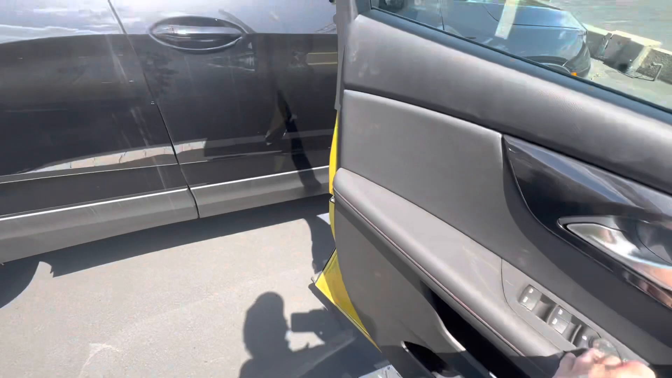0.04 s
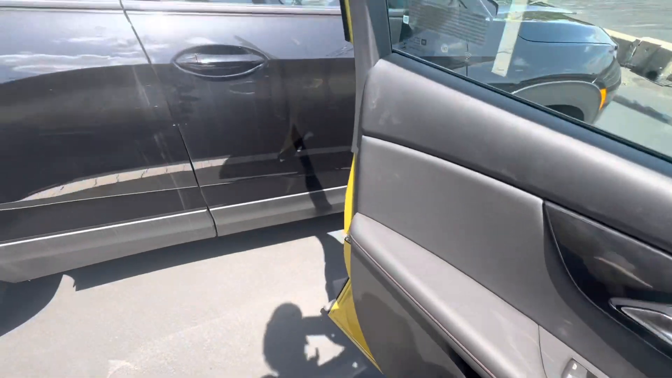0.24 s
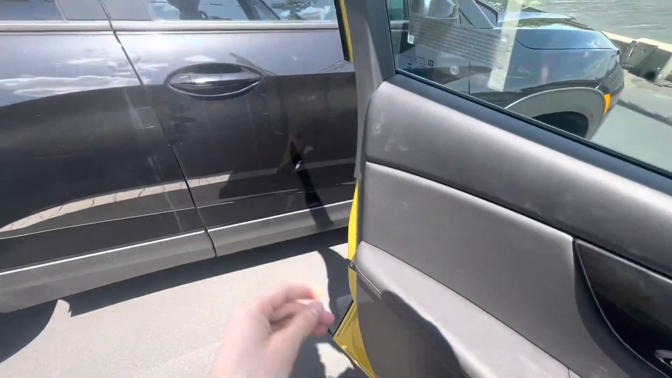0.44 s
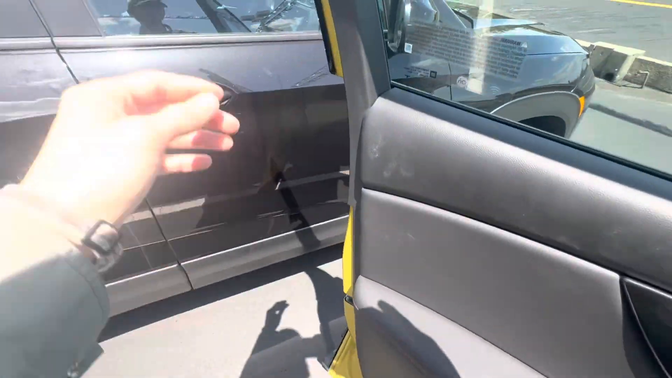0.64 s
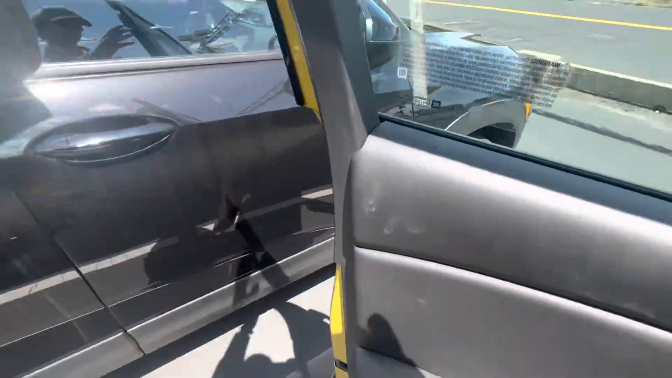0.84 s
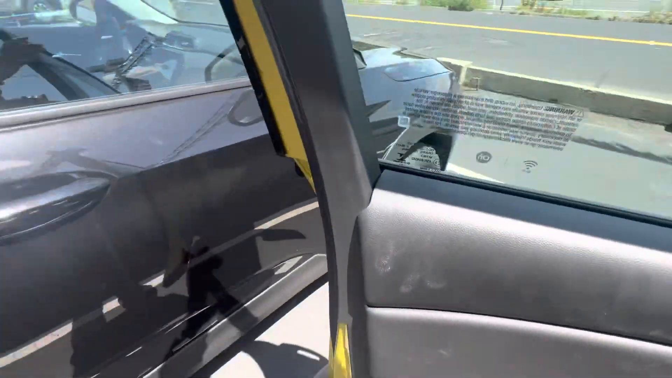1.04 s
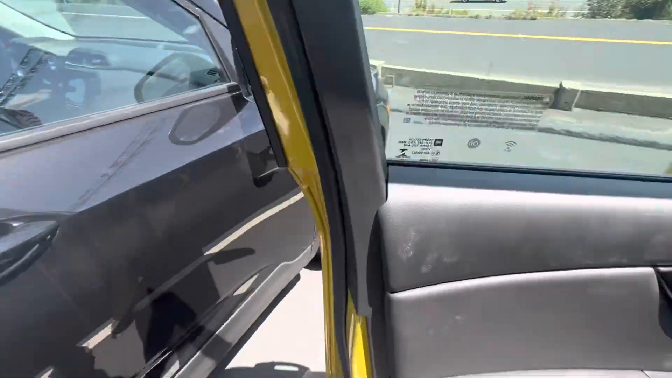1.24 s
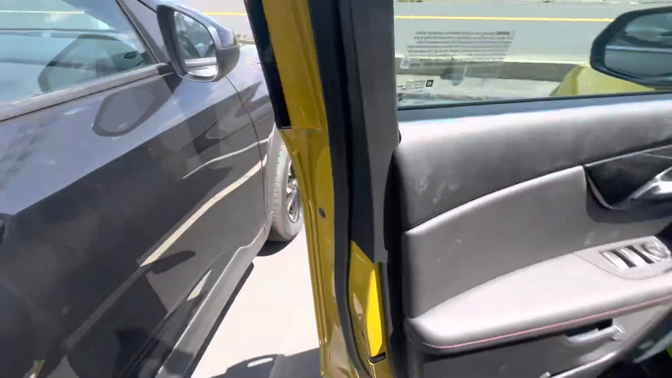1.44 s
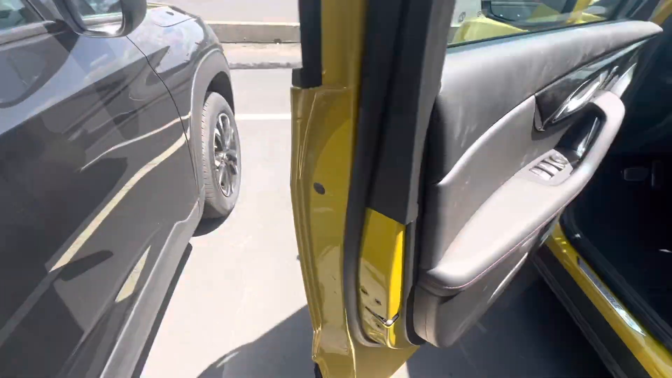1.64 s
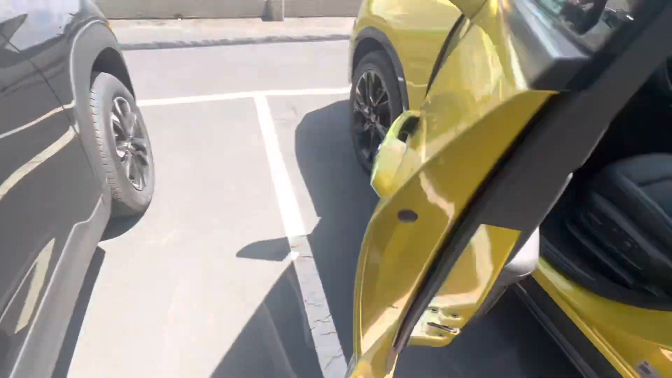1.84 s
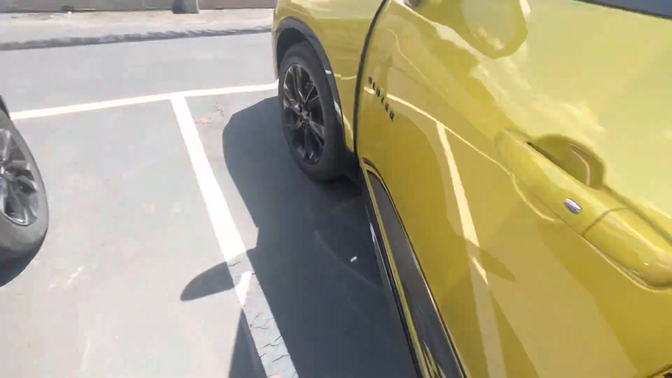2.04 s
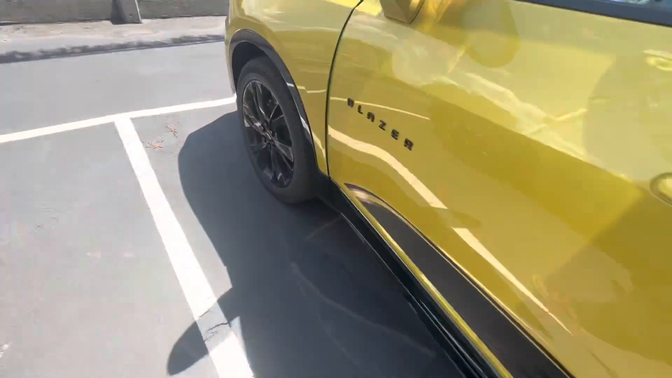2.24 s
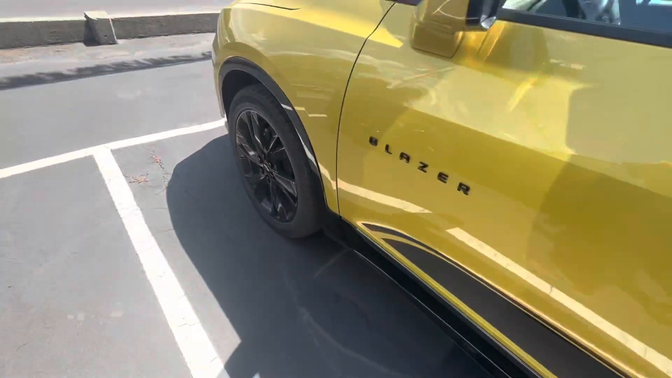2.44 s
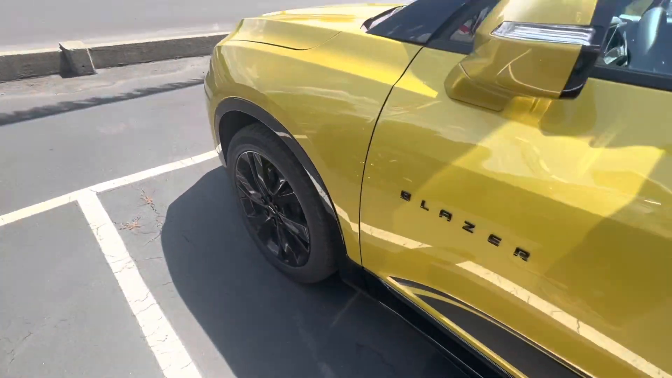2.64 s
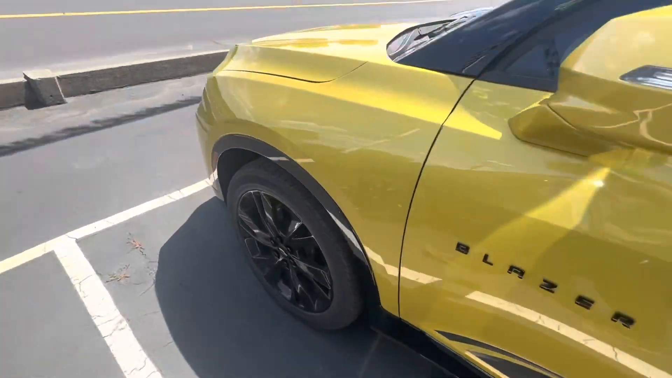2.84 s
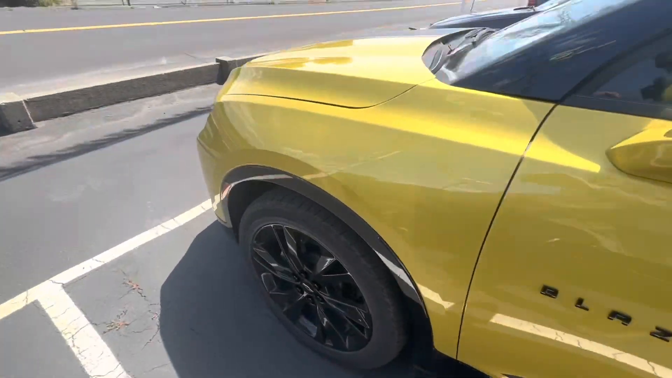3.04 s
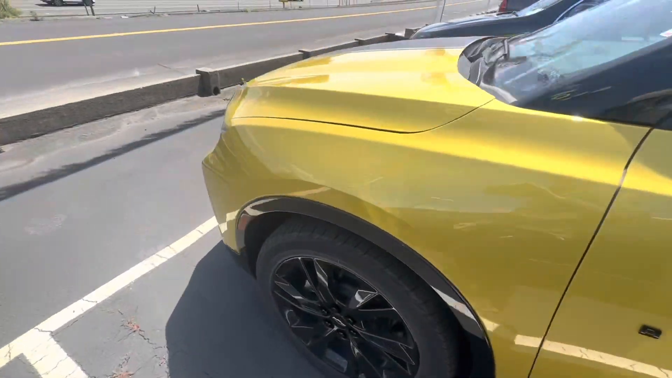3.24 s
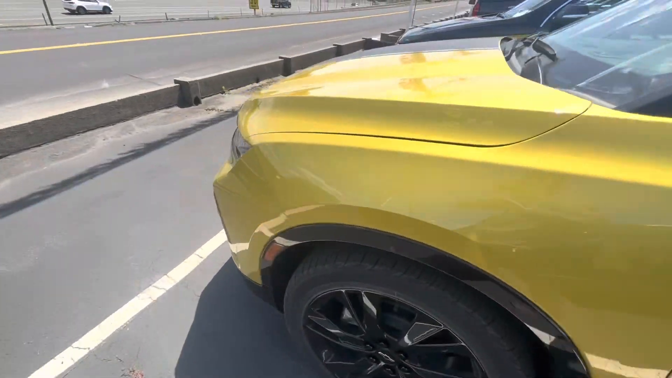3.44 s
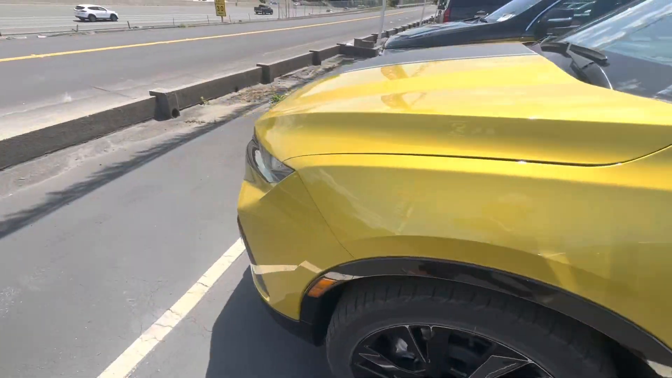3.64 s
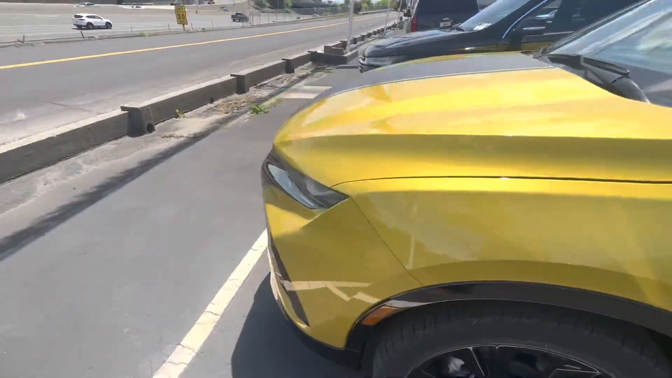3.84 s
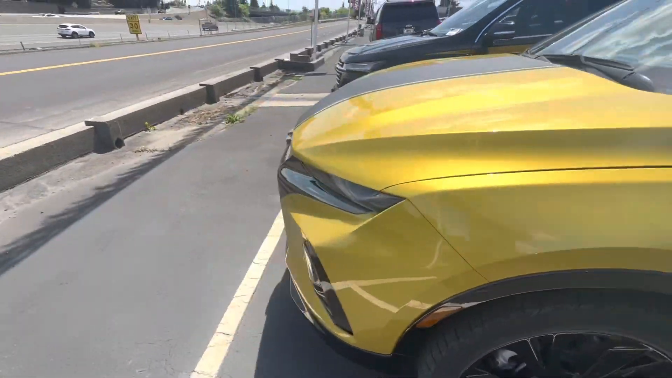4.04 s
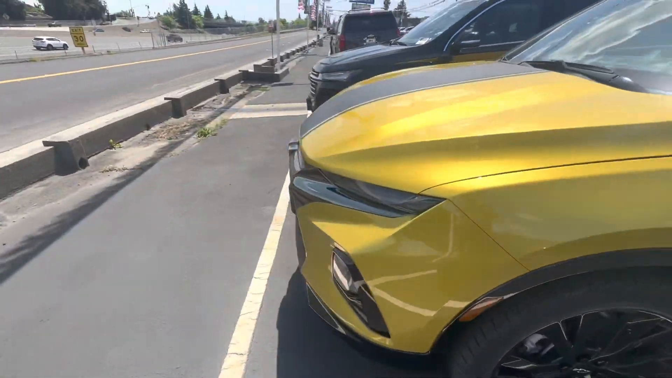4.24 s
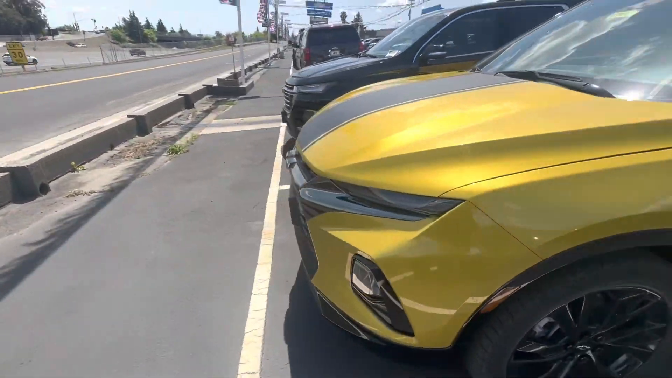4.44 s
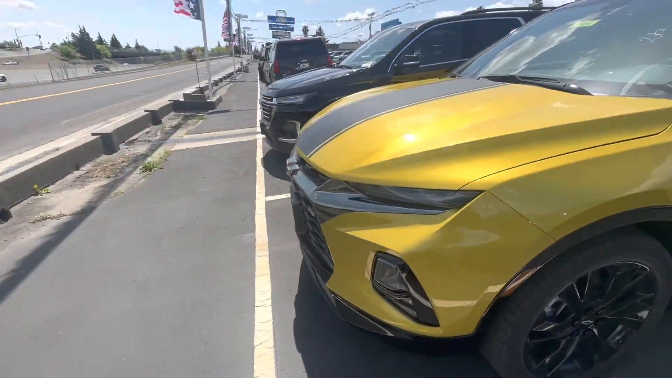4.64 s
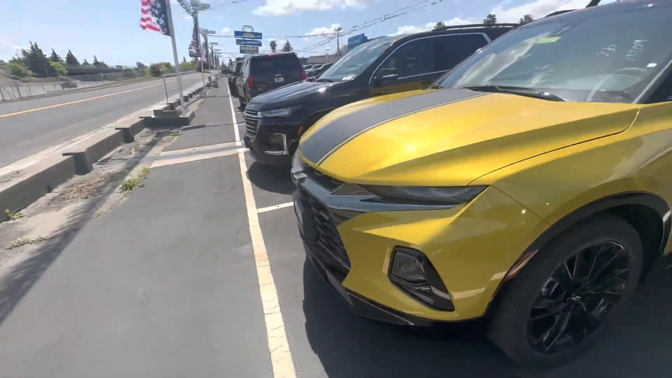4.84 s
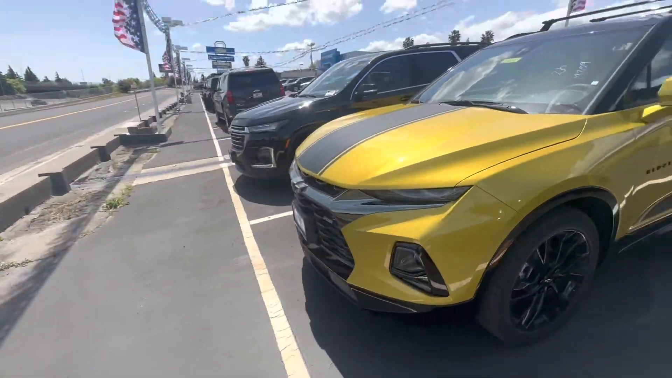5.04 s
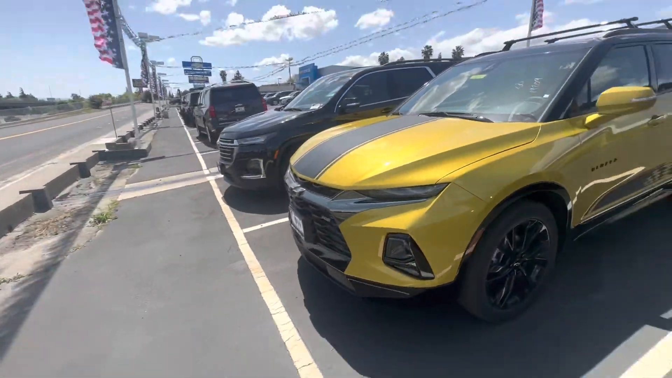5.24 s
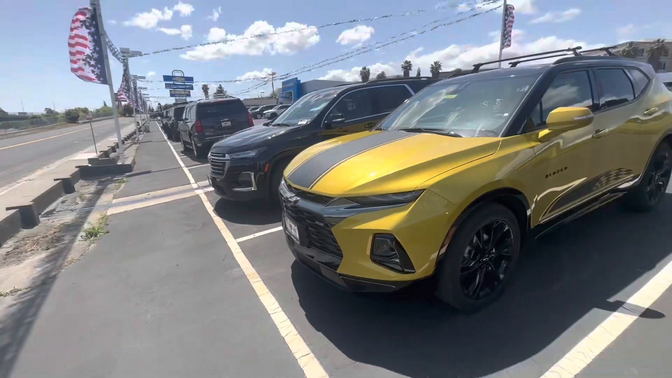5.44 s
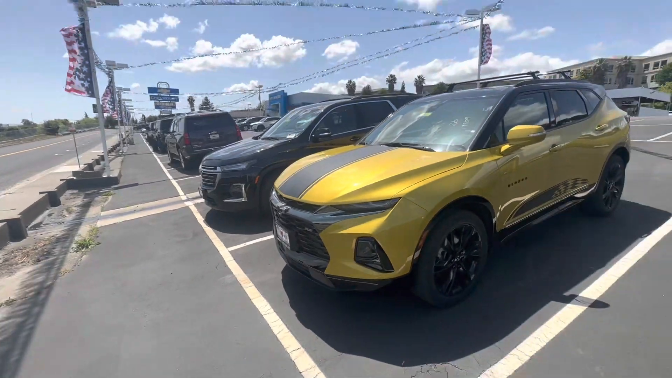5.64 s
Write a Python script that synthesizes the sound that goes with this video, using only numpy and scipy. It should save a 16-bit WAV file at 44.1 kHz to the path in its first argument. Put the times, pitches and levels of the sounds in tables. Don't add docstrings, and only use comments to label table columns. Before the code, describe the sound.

Outdoors by a busy road, a car door shuts with one solid thump, then low traffic roar and engine drone swell closer.

```python
import sys
import numpy as np
from scipy import signal
from scipy.fft import rfft, irfft, next_fast_len
from scipy.io import wavfile

SR = 44100
rng = np.random.default_rng(int(sys.argv[2]) if len(sys.argv) > 2 else 0)


def makeup_ratio(level_db):
    decades = np.asarray(level_db, float) / 20
    return 10 ** decades


def materialize(psi):
    bounded = np.clip(np.atleast_2d(psi).T, -1, 1)
    quanta = np.round(bounded * 32767).astype(np.int16)
    wavfile.write(sys.argv[1], SR, quanta)


N = 251811
DOOR_LAG = 21.5


def rms_one(x):
    return x / np.sqrt(np.mean(x ** 2) + 1e-20)


def in_time(rows):
    s, *columns = np.transpose(rows)
    return [np.interp(np.arange(N) / SR, s, c) for c in columns]


def at_hz(points, hz):
    points = np.array(points)
    return np.interp(np.log(hz), np.log(points[:, 0]), points[:, 1])


def bump(s, width):
    return np.exp(-((np.arange(N) / SR - s) / width) ** 2)


def dying(s, level_db, t60):
    out, start = np.zeros(N), int(s * SR)
    t = np.arange(min(int(2 * t60 * SR), N - start)) / SR
    out[start:start + len(t)] = makeup_ratio(level_db - 60 * t / t60)
    return out


def drift(rate):
    r = np.exp(-80 * np.pi * rate / SR)
    steps = rng.standard_normal(N // 40 + 2002)
    slow = signal.lfilter([1], [1, -2 * r, r * r], steps)[2000:]
    return np.interp(np.arange(N) / 40, np.arange(len(slow)), rms_one(slow))


def band_pass(x, edges, order=2):
    return signal.sosfilt(signal.butter(order, edges, "band", fs=SR, output="sos"), x)


def shaped(x, spectrum, share):
    size = next_fast_len(N)
    hz = np.maximum(np.arange(size // 2 + 1) * SR / size, 1)
    return irfft(rfft(x, size) * makeup_ratio(share * at_hz(spectrum, hz)), size)[..., :N]


def coloured(spectrum, channels):
    return rms_one(shaped(rng.standard_normal((channels, N)), spectrum, 0.98))


def ring(clicks, hz, t60):
    r, w = makeup_ratio(-60 / (t60 * SR)), 2 * np.pi * hz / SR
    return signal.lfilter([0, np.sin(w)], [1, -2 * r * np.cos(w), r * r], clicks + 1e-18)


def spread_ports(x, lag):
    at = np.arange(N)
    return np.array([np.interp(at - lag / 2, at, x[0]), np.interp(at + lag / 2, at, x[1])])


def to_ports(x, lag, pan_db):
    left, right = spread_ports([x, x], lag)
    return np.array([makeup_ratio(pan_db / 2) * left, makeup_ratio(-pan_db / 2) * right])


# t/s, half width/s, extra openness
GAPS = [(0, .02, 0.4), (.45, 0.42, 0.15), (.1, 0.046, -0.064), (.27, 0.018, 0.063), (.51, 0.057, -0.46),
        (.85, 0.11, 0.1), (.37, 0.084, 0.37), (.63, 0.033, 0.22), (1.15, 0.25, 0.4), (1.33, 0.029, -0.048),
        (1.48, 0.097, 0.2), (1.63, 0.038, -0.12), (1.82, 0.091, 0.023)]


def openness():
    start_s, end_s = 0.17, 2.27
    step = np.clip((np.arange(N) / SR - start_s) / (end_s - start_s), 0, 1) ** 1.26
    return np.clip(step + sum(extra * bump(s, width) for s, width, extra in GAPS), 0, 1)


def duck_db():
    attack_s, release_s = 0.05, 0.07
    t = np.maximum(np.arange(N) / SR - 2.43, 0)
    return -6 * (1 - np.exp(-t / attack_s)) * np.exp(-t / release_s) * 2


def hiss_db():
    return -54 + 4 * bump(0.13, 0.54) + 2.5 * bump(4.4, 1.4)


# f/Hz, level/dB
HISS = [(1500, 6.5), (2500, 1), (4000, 5.5), (6000, 3.5), (8000, 4), (10200, 1.5), (10650, -31),
        (16000, -50)]
# f/Hz, left-right/dB
HISS_PAN = [(3000, 7.5), (4200, 4), (6000, 13.5), (8000, 2), (9600, -2)]
# f/Hz, level/dB per Hz
TOP_HISS = [(11800, -50), (12250, -8), (12700, -1), (14000, 0.5), (15400, 0), (16000, -26)]


def hiss():
    level_db = hiss_db()
    own = shaped(coloured(HISS, channels=2), HISS_PAN, np.array([[.5], [-.5]])) * makeup_ratio(level_db + 4)
    return own + coloured(TOP_HISS, channels=1) * makeup_ratio(level_db - 10.5)


def opposed_hiss():
    band = band_pass(rng.standard_normal(N), (10200, 12900), order=8)
    return rms_one(band) * makeup_ratio(hiss_db() - 9.5 + duck_db()) * [[1], [-1]]


# f/Hz, level/dB per Hz
ROAD_COLOUR = [(15, -46), (25, -14.5), (107, -2), (130, -5.5), (147, -10.5), (188, -11), (247, -10),
               (349, -17), (414, -17), (661, -10.5), (1320, -26), (2440, -39), (3120, -39), (5640, -46.5),
               (9000, -83), (11700, -84), (19800, -120)]
# t/s, level/dB
TRAFFIC = [(0.0, -37.5), (1.24, -34.5), (1.4, -34.5), (1.88, -33.5), (2.08, -33.5), (2.42, -32),
           (2.97, -31), (3.37, -28.5), (4.2, -27.5), (4.36, -27.5), (4.83, -26), (5.71, -26)]
# f/Hz, share of its swing
FOLLOWS = [(65, 0.28), (250, 0.89), (750, 1.336), (2500, 1.13)]
# f/Hz, level/dB
SHELTER = [(300, 2.5), (500, -4.5), (800, 2), (1150, 6.5), (1550, 1), (2200, 12.5), (3500, -11.5)]
# f/Hz, level/dB
SHELTER_LOSS = [(60, 15), (130, -0.5), (300, -3.5), (600, -1)]
# f/Hz, level/dB
DOORWAY = [(200, -4), (450, 3), (1100, 5), (2200, 3), (4000, 12)]
# f/Hz, factor on left-right dB
SHADE = [(300, 1), (700, 2.03), (2000, -0.5), (5000, 2)]
# f/Hz, factor on direct share
DIRECT = [(40, 2.9), (150, 1.49), (700, 1.26), (2500, 0.9), (5000, 0.074), (10000, .3)]


def road(lag, share, pan_db, low_pan_db, shelter, clear, patchy_db):
    near_db = in_time(TRAFFIC)[0]
    near_db = near_db - near_db[N // 2:].mean()
    doorway = bump(0.24, 0.54)
    wave, scattered, together = np.zeros((2, N)), np.zeros((2, N)), drift(3.3)
    white = rng.standard_normal((2, 3, N))
    edges = 26 * 2 ** np.arange(0, 8.3, .4)
    for k, (low, high) in enumerate(zip(edges, edges[1:])):
        band = band_pass(white[k % 2], [low, high])
        hz = np.sqrt(low * high)
        level_db = at_hz(ROAD_COLOUR, hz) + at_hz(FOLLOWS, hz) * near_db
        level_db += shelter * at_hz(SHELTER, hz) + (1 - clear) * at_hz(SHELTER_LOSS, hz)
        level_db += doorway * at_hz(DOORWAY, hz)
        gain = makeup_ratio(level_db + patchy_db * (0.6 * together + drift(10.6)))
        side = makeup_ratio((low_pan_db if hz < 300 else pan_db * at_hz(SHADE, hz)) / 2)
        sides = gain * np.array([side, 1 / side])
        alike = np.clip(share * at_hz(DIRECT, hz), 0, .98)
        wave += sides * (np.sqrt(alike) * band[0])
        scattered += sides * np.sqrt(1 - alike) * band[1:]
    total = spread_ports(wave, lag) + scattered
    return makeup_ratio(-22) * total / np.sqrt(np.mean(total[:, N // 2:] ** 2))


# t/s, half width/s, f/Hz, width/Hz, level/dB
BRIEF_HUMS = [(3, 0.18, 82, 3.3, -33), (3.7, 0.14, 67, 2.7, -33.5), (3.85, 0.24, 170, 4.3, -30.5),
              (4.1, 0.15, 150, 5.7, -35), (1.95, 0.15, 190, 35, -34), (1.3, 0.081, 386, 89, -42),
              (1, .15, 1100, 230, -44), (0.2, 0.13, 530, 80, -43.5), (.2, 0.12, 174.3, 34, -39),
              (3.66, .12, 710, 19, -35), (4.29, 0.19, 710, 52, -36.5), (4.75, 0.33, 760, 42, -35),
              (5.2, 0.17, 205, 3.5, -33), (5.39, .18, 76, 14, -26), (2.1, 0.26, 1080, 87, -41.5),
              (1.38, 0.099, 765, 120, -38), (2.08, 0.16, 634, 140, -37)]


def brief_hums():
    out, noise = np.zeros(N), rng.standard_normal((len(BRIEF_HUMS), N))
    for v, (s, half, hz, width_hz, level_db) in zip(noise, BRIEF_HUMS):
        near = slice(max(int((s - .8) * SR), 0), int((s + .8) * SR))
        t60 = 2.1 / width_hz
        hum = ring(ring(v[near], hz, t60), hz, t60)
        out[near] += makeup_ratio(level_db) * bump(s, half)[near] * rms_one(hum)
    return out


# t/s, half length/s, f/Hz, level/dB
SQUEAK = [
    (4.742, .012, 10400, -52),
    (4.735, .016, 11600, -55),
    (4.765, .03, 15650, -54),
]


def squeak():
    t, out = np.arange(N) / SR, np.zeros(N)
    for s, half, hz, level_db in SQUEAK:
        out += makeup_ratio(level_db) * bump(s, half) * np.sin(2 * np.pi * hz * t)
    return out * [[1.8], [.1]]


# t/s, length/s, level/dB, left-right/dB, top f/Hz
GUSTS = [(0.356, 0.08, -43, 13, 200), (0.71, 0.4, -43.5, 21.5, 252), (1.12, 0.2, -31, 1, 95),
         (.82, .25, -41, 1, 90), (1.524, 0.19, -28, 3, 170), (2.043, 0.19, -30, -4, 154),
         (3.501, 0.067, -28, 19, 182), (3.725, 0.086, -30, 2, 130), (5.143, 0.15, -22.5, 2, 116),
         (5.36, 0.19, -23.5, 0, 90), (3.0, .2, -25.5, 2, 80)]


def wind():
    out, half = np.zeros((2, N)), SR // 3
    noise = rng.standard_normal((2, N)) * makeup_ratio(6.2 * drift(51))
    t = np.arange(-half, half) / SR
    for s, length, level_db, pan_db, top_hz in GUSTS:
        near = slice(int(s * SR) - half, int(s * SR) + half)
        lump = rms_one(band_pass(noise[:, near], [45, top_hz]))
        swell = np.exp(-(t / (.5 * length)) ** 2)
        out[:, near] += lump * swell * makeup_ratio(level_db + pan_db / 2 * np.array([[1], [-1]]))
    return out


# t/s, firing f/Hz, level/dB
PASSER = [
    (4.301, 152, -56),
    (4.702, 149.4, -28.5),
    (4.871, 143.7, -25),
    (5.161, 138.2, -21.5),
    (5.399, 134.4, -27),
    (5.71, 128, -29),
]


def passer():
    hz, level_db = in_time([(0, 152, -90), (4, 152, -90)] + PASSER)
    near_db = np.interp(np.arange(N) / SR, [4.3, 5.1, 5.71], [-25, -6, 0])
    tread_hz, tread_width_hz = 464, 98
    hum = rms_one(ring(rng.standard_normal(N), tread_hz, 2.7 / tread_width_hz))
    hum = hum * makeup_ratio(PASSER[-1][2] + 3.7 + near_db)
    tone = makeup_ratio(level_db + 0.79 * drift(5.9)) * np.sin(2 * np.pi * np.cumsum(hz) / SR)
    return np.sqrt(2) * tone + hum


# multiple of cycle pitch, level/dB
ORDERS_DB = [(2, -16), (3, -9), (7, -16), (9.5, -9), (10.5, -11), (11.5, -10), (12, -8), (15, -12)]
# t/s, level/dB
BOOM = [(0, -16.5), (1.3, -28), (1.85, -20.5), (2.5, -29.5), (2.9, -22), (3.65, -23), (4.45, -24),
        (4.75, -28), (5.2, -39), (5.71, -27.5)]
# t/s, level/dB
WHINE = [(0, -53), (3.6, -42), (4.0, -34), (4.45, -28), (4.85, -32), (5.1, -29), (5.45, -26), (5.71, -26)]


def engine(clear):
    t = np.arange(N) / SR
    abreast_s, pass_s = 4.3, 1.5
    cycle_hz = 24.15 - 1.6 * np.tanh((t - abreast_s) / pass_s)
    boom_db = in_time(BOOM)[0] - 21.5 * (1 - clear)
    upper_db = -35 + 0.5 * (t[-1] - t) - 15 * np.maximum(3.6 - t, 0)
    turn = 2 * np.pi * np.cumsum(cycle_hz * (1 + .0015 * drift(3))) / SR
    out = makeup_ratio(boom_db + 1.2 * drift(13.3)) * np.sin(5 * turn)
    out += makeup_ratio(in_time(WHINE)[0] + .8 * drift(3)) * np.sin(14 * turn)
    for multiple, level_db in ORDERS_DB:
        carrier_db = boom_db if multiple < 8 else upper_db
        waver_db = 4 * drift(2.5)
        phase = rng.uniform(0, 2 * np.pi)
        out += makeup_ratio(carrier_db + level_db + waver_db) * np.sin(multiple * turn + phase)
    return np.sqrt(2) * out


# t/s, peak level/dB, centre f/Hz, t60/s
CLICKS = [(0.193, -23, 13200, 0.0049), (0.224, -27, 11000, 0.015), (0.231, -35, 9500, .06),
          (0.248, -27, 9900, 0.025), (0.846, -30, 10500, 0.025), (1.447, -36, 2220, 0.1),
          (1.454, -39, 5500, 0.059), (1.879, -41, 5530, 0.018), (1.880, -29, 2300, .018),
          (2.435, -33.5, 1900, 0.18), (2.363, -27.5, 1730, 0.15), (2.412, -25.5, 2270, 0.13),
          (1.995, -41.5, 6100, .02), (4.728, -51, 6940, 0.033), (5.337, -59, 4000, 0.017)]


def clicks():
    out, size = np.zeros((2, N)), SR // 5
    for s, level_db, hz, t60 in CLICKS:
        noise = rng.standard_normal((3, size))
        puff = band_pass(noise[0] + 0.8 * noise[1:], [hz / 1.5, min(hz * 1.5, 19000)])
        start = int(s * SR)
        out[:, start:start + size] += rms_one(puff) * dying(0, level_db - 7, t60)[:size]
    return out


# t/s, peak level/dB, ring f/Hz, t60/s
TICKS = [(1.449, -38, 1830, 0.02), (1.879, -34, 2080, 0.013), (1.453, -39, 2662, 0.055),
         (1.881, -42, 2500, .012), (1.448, -39, 2900, .012), (2.366, -27, 1750, 0.03),
         (2.385, -20, 1560, .03), (2.409, -23, 1500, 0.033), (3, -28, 1160, .03), (2.381, -35, 6050, 0.025),
         (2.383, -29.5, 3400, 0.016), (2.409, -28.5, 2630, 0.056), (2.411, -31.5, 3300, .02),
         (2.416, -30, 2420, 0.049), (2.428, -29, 3200, .015), (2.385, -34, 4350, .015),
         (2.382, -31, 7500, 0.022), (2.419, -37, 1550, .04), (2.9, -36, 970, 0.043)]


def ticks():
    out, size = np.zeros(N), SR // 5
    for s, level_db, hz, t60 in TICKS:
        click = makeup_ratio(level_db) * (np.arange(size) == 0)
        start = int(s * SR)
        out[start:start + size] += ring(click, hz, t60) - 0.32 * ring(click, 1.13 * hz, t60)
    return to_ports(out, DOOR_LAG, -8)


# t/s, cabin air push level/dB, panel knock level/dB, latch level/dB, rattle level/dB
BLOWS = [(2.366, -40, -30, -34, -46), (2.378, -40, -28, -13, -36), (2.382, -40, -24, -4, -30),
         (2.3835, -26, -7, -12, -34), (2.397, -10, -14, -24, -37), (2.409, -40, -18, -19, -32),
         (2.4175, -7, -8, -15, -35), (2.427, -40, -20, -16, -35), (2.4375, -13, -14, -13, -44),
         (2.458, -22, -18, -26, -49), (2.546, -40, -34, -32, -48)]
# f/Hz, level/dB, t60/s
SHELL = [(50.5, 0, .29)]
# f/Hz, level/dB, t60/s
PANEL = [(69.6, 5, 0.067), (128, -2, 0.044), (182, -10.5, 0.071), (222, -17, 0.1), (334, -5.5, 0.094)]
# f/Hz, level/dB, t60/s
LATCH = [(518, -2.5, 0.02), (582, -19, 0.071), (710, -9, 0.036), (990, -18, 0.026), (1750, -18, 0.01),
         (6100, -26.5, .02)]
# t/s, f/Hz, level/dB, t60/s
GLASS = [
    (2.3822, 258, -9, .12),
    (2.379, 720, -14, .03),
    (2.4164, 266, -12, .16),
    (2.410, 335, -14, .09),
    (2.4172, 135, -6, .045),
    (2.435, 62, -9, .07),
    (2.4314, 268, -13, .16),
    (2.4415, 92, -22, .3),
]
# f/Hz, level/dB per Hz
RATTLE = [(530, -41), (900, 7.5), (1460, 9), (2200, -8), (9150, -8), (10300, -10), (11000, -18),
          (11900, -45), (13000, -14), (15000, -18)]


def door():
    rows = np.array(BLOWS)
    at, out = (rows[:, 0] * SR).astype(int), np.zeros(N)
    chance = rng.normal(0, 2, (len(rows), 20))
    start_lag = int(.0045 * SR)
    for part, (modes, sign, spread) in enumerate([(SHELL, -1, 0), (PANEL, -1, 1), (LATCH, 1, 1)]):
        for k, (hz, level_db, t60) in enumerate(modes):
            struck = np.zeros(N)
            struck_db = rows[:, 1 + part] + level_db + spread * chance[:, k + 5 * part]
            struck[at + (2 - part) * start_lag] = sign * makeup_ratio(struck_db)
            out += ring(struck, hz, t60)
    for rebound_s, hz, level_db, t60 in GLASS:
        out += ring(makeup_ratio(level_db) * (np.arange(N) == int(rebound_s * SR)), hz, t60)
    skin = rms_one(band_pass(rng.standard_normal(N), (170, 600)))
    out += skin * sum(dying(row[0], row[2] - 17, 0.14) for row in BLOWS)
    shake = sum(dying(row[0], row[4], .065) for row in BLOWS)
    trim = coloured(RATTLE, channels=3) * shake
    return to_ports(out + trim[0], DOOR_LAG, -1.5) + [[.55], [.9]] * trim[1:]


# t/s, road on the right 1 to left -1, share arriving directly 0-1, shelter 0-1
TURN = [
    (0, 1, 0.57, 1),
    (.8, 0.89, 0.23, 0.28),
    (1.45, 1, 0.08, 0.25),
    (1.9, -0.32, 0.33, 0.73),
    (2.7, -0.66, 0.2, 0.92),
    (3.2, -0.97, 0.51, 0.48),
    (5.71, -0.94, 0.7, 0.24),
]


def scene():
    facing, share, shelter = in_time(TURN)
    lag, clear = 21.1 * facing, openness()
    pan_db = 3 * np.minimum(np.arange(N) / SR / 3.2, 1)
    low_pan_db = 0.64 + 5.84 * bump(1.47, 0.43)
    engines = to_ports(engine(clear) + passer(), 1.55 * lag, low_pan_db)
    engines += to_ports(brief_hums(), 0.54 * lag, low_pan_db)
    roar = road(lag, share, pan_db, low_pan_db, shelter, clear, patchy_db=1.35)
    background = roar + engines + wind() + hiss()
    return makeup_ratio(duck_db()) * background + door() + clicks() + ticks() + opposed_hiss() + squeak()


def band_limit(x):
    return signal.sosfilt(signal.butter(12, 15850, fs=SR, output="sos"), x)


def record(dry):
    cut, state = np.zeros_like(dry), np.zeros((2, 2, 2))
    shut_hz, open_hz = 261, 38.4
    opened = openness() ** 2.35
    corner_hz = shut_hz * (open_hz / shut_hz) ** opened
    for i in range(0, N, 512):
        w = 2 * np.pi * max(corner_hz[i], 15) / SR
        damp, c = np.sin(w) / np.sqrt(2), np.cos(w)
        section = np.array([(1 + c) / 2, -1 - c, (1 + c) / 2, 1 + damp, -2 * c, 1 - damp]) / (1 + damp)
        cut[:, i:i + 512], state = signal.sosfilt([section, section], dry[:, i:i + 512], zi=state)
    return band_limit(1.1 * np.tanh(cut / 1.1))


dry = scene()
out = record(dry)
materialize(out)
```